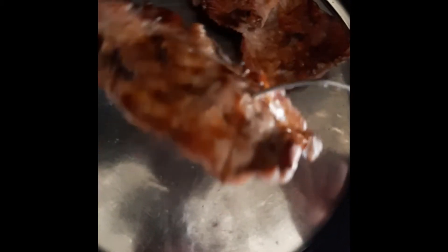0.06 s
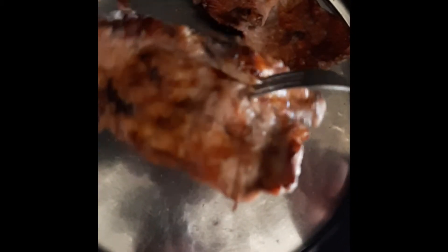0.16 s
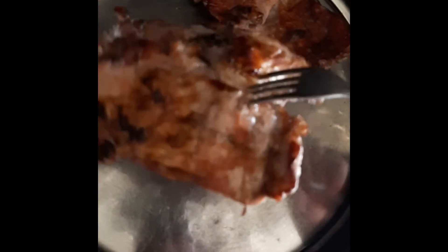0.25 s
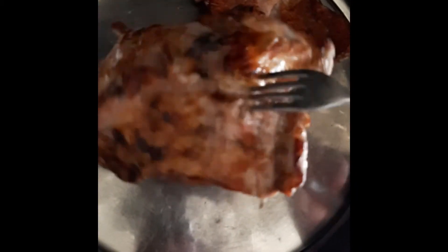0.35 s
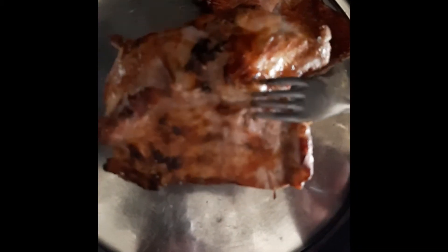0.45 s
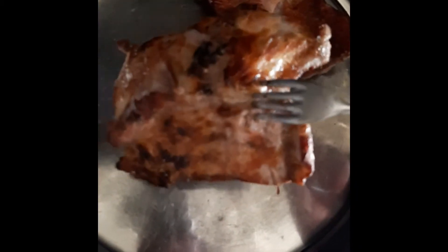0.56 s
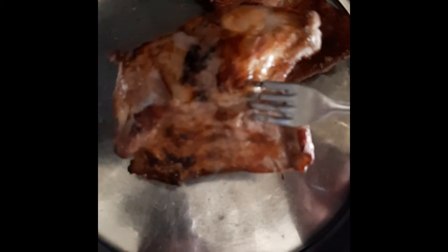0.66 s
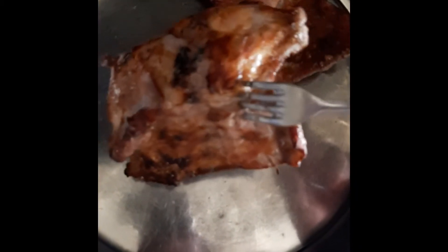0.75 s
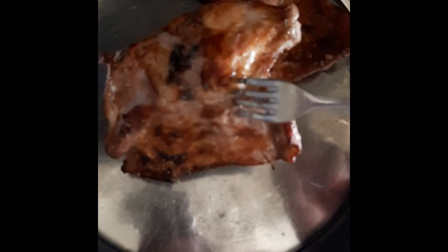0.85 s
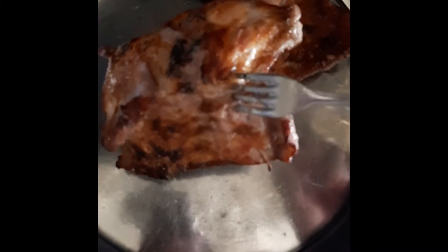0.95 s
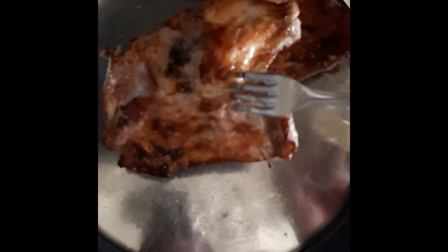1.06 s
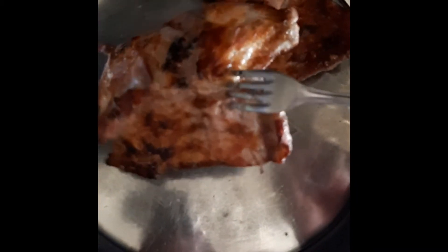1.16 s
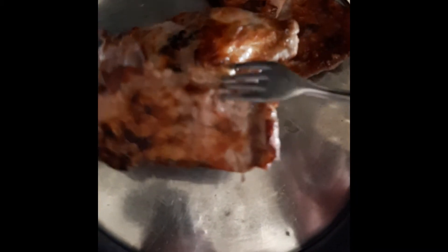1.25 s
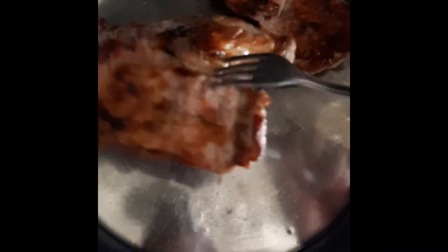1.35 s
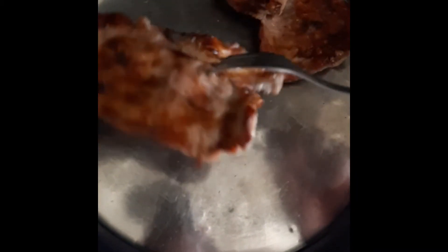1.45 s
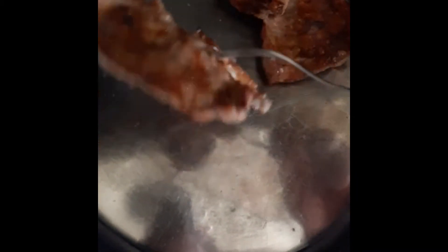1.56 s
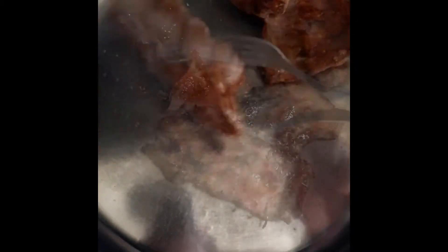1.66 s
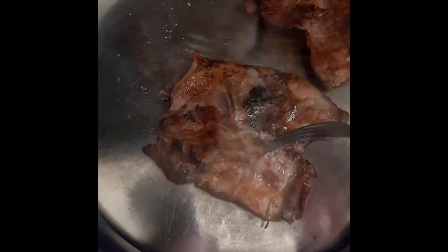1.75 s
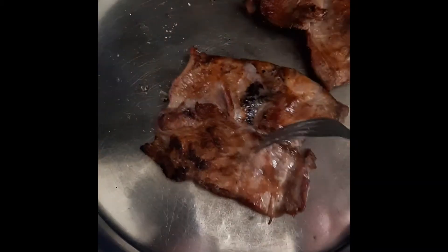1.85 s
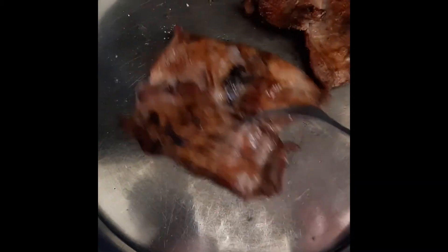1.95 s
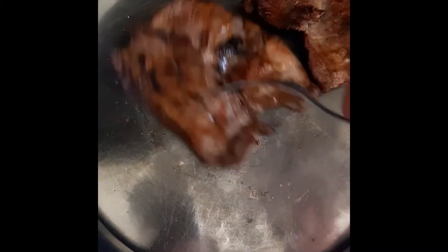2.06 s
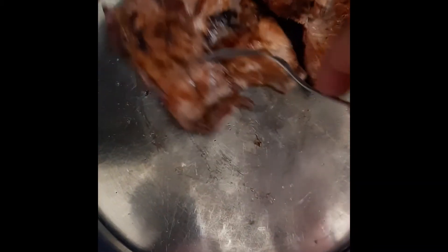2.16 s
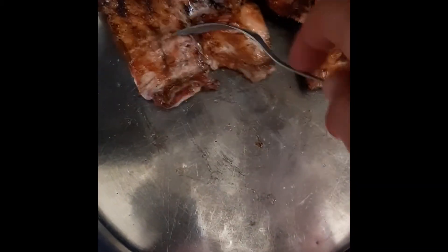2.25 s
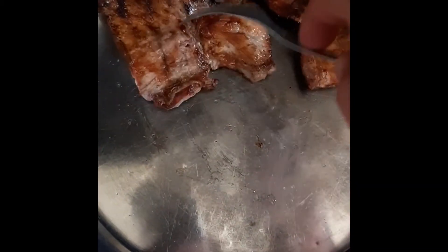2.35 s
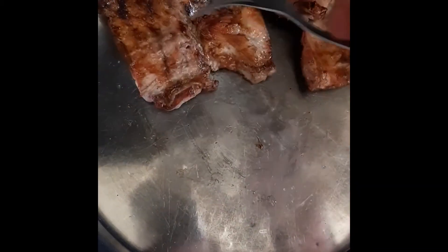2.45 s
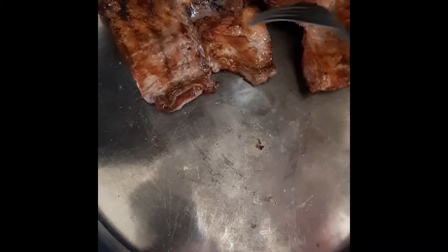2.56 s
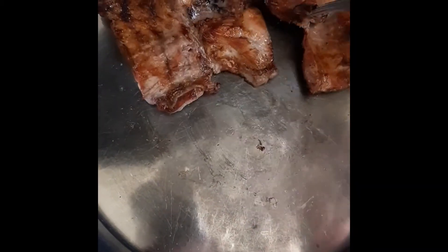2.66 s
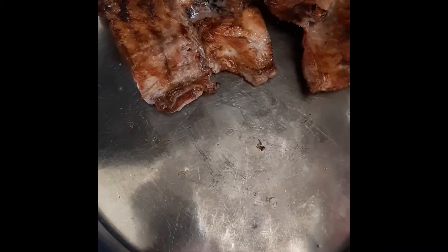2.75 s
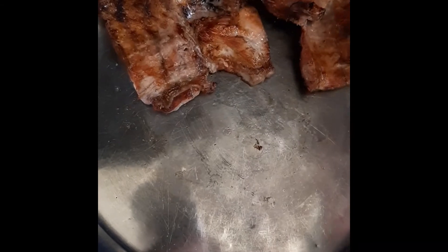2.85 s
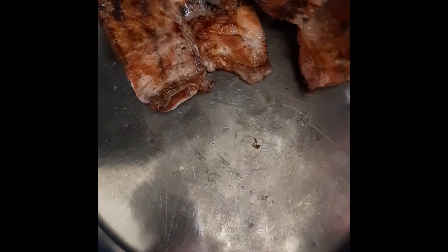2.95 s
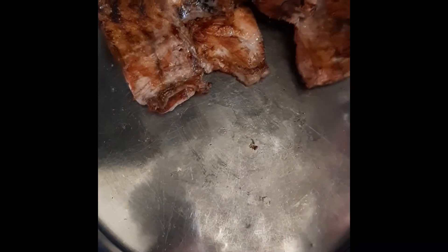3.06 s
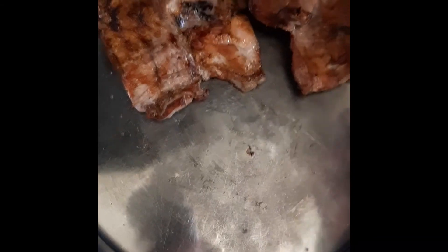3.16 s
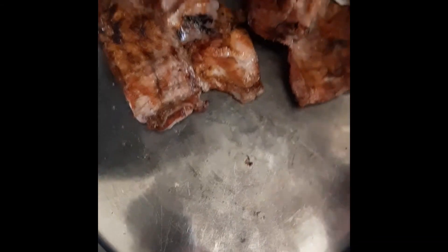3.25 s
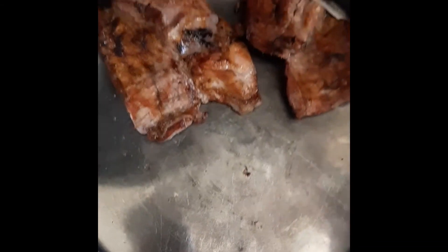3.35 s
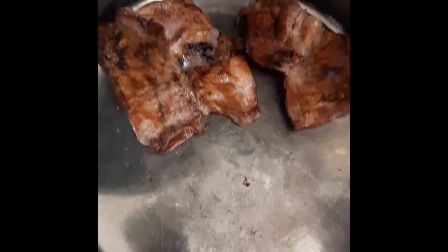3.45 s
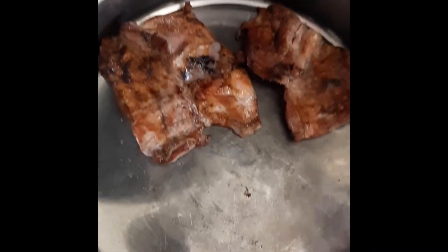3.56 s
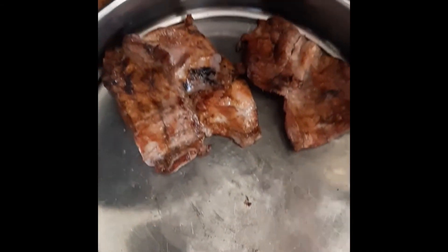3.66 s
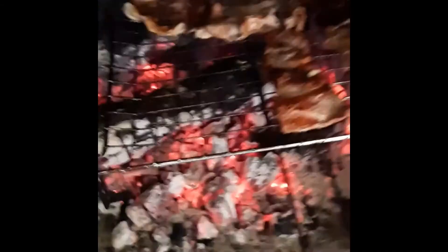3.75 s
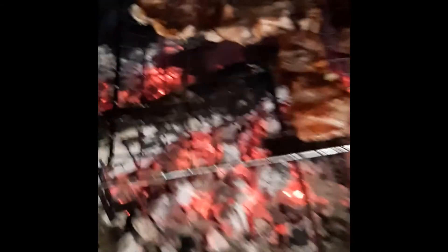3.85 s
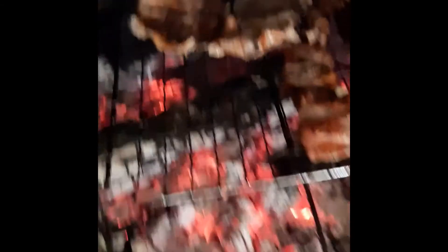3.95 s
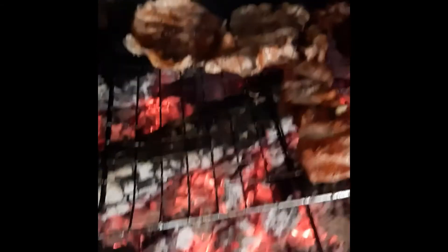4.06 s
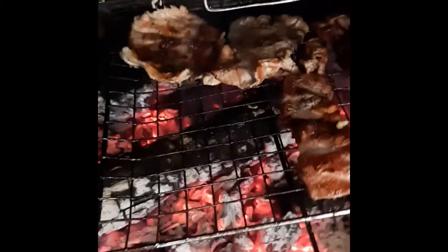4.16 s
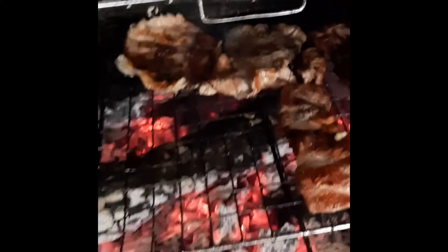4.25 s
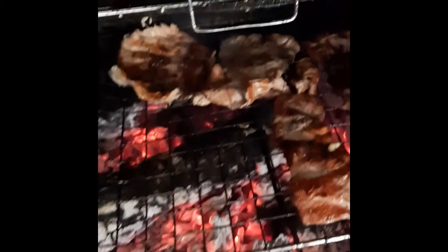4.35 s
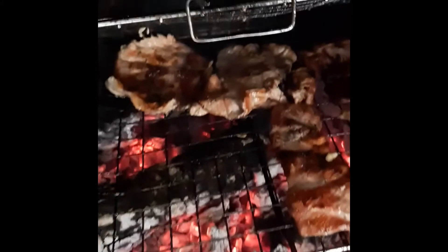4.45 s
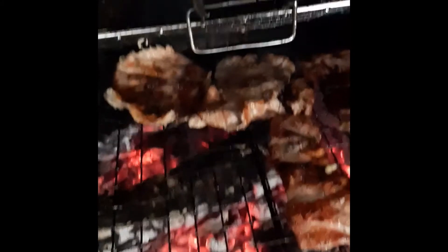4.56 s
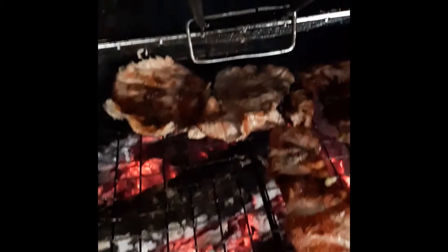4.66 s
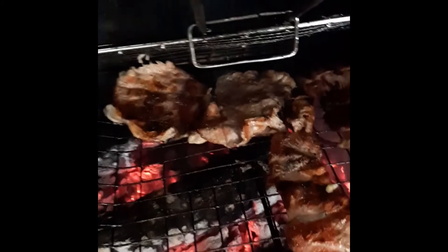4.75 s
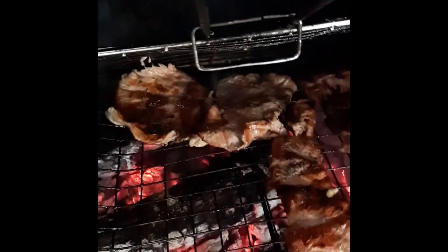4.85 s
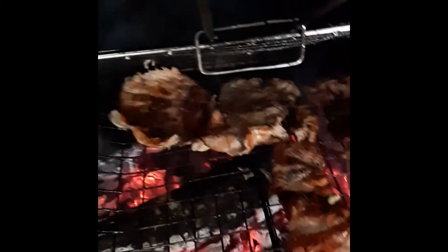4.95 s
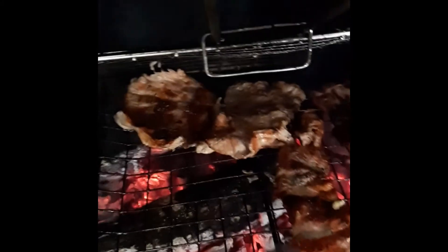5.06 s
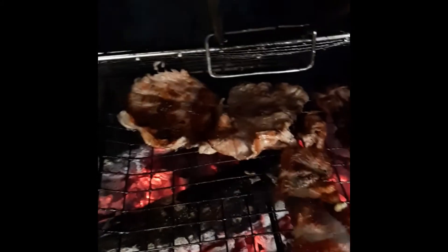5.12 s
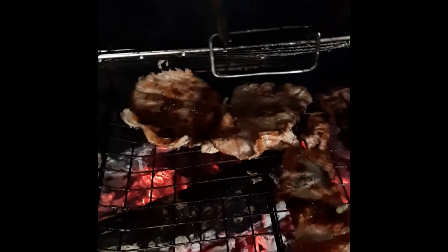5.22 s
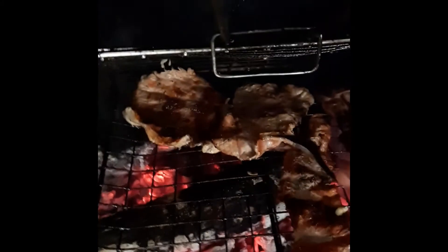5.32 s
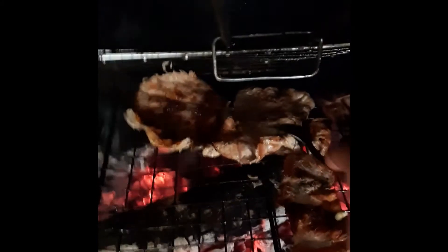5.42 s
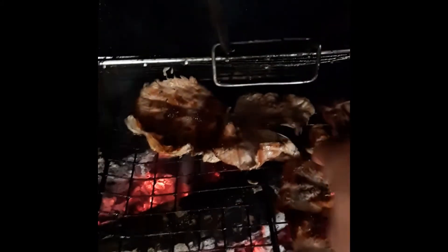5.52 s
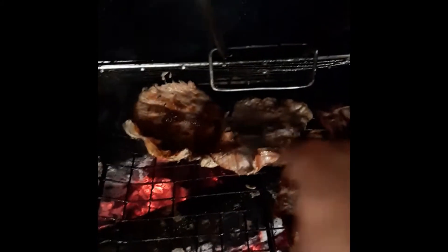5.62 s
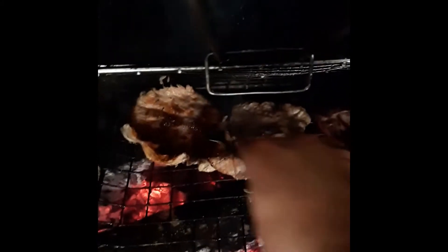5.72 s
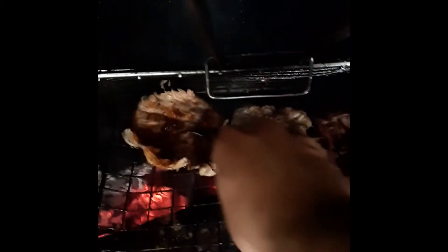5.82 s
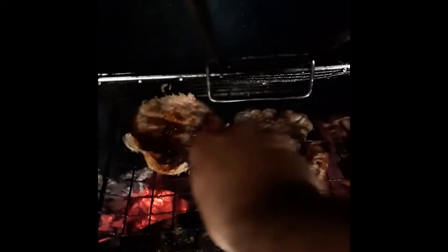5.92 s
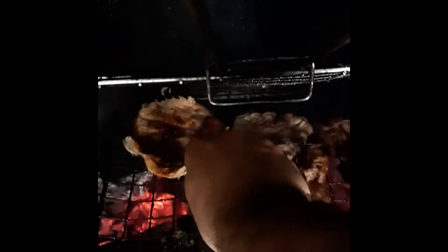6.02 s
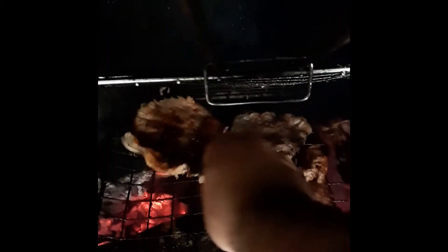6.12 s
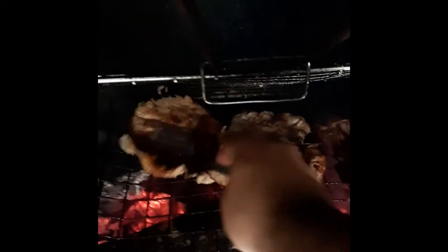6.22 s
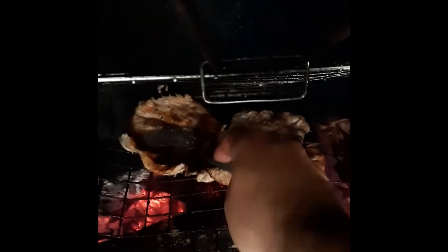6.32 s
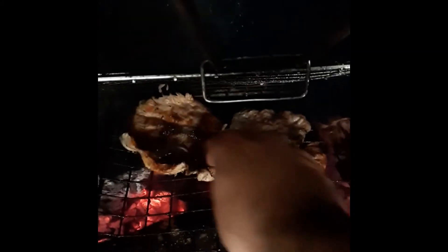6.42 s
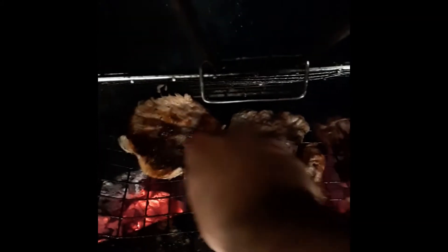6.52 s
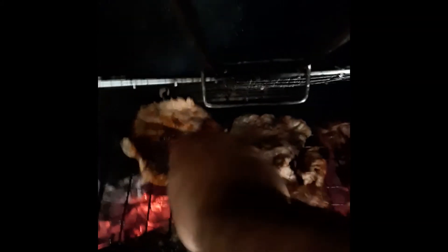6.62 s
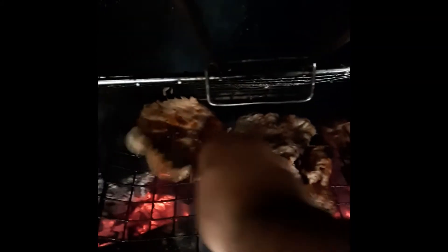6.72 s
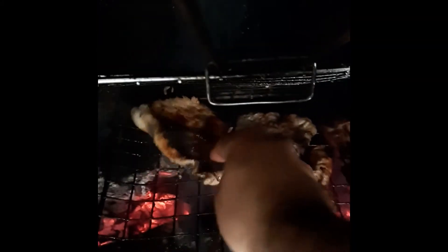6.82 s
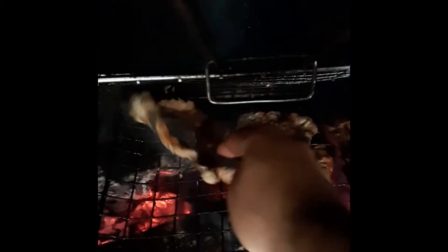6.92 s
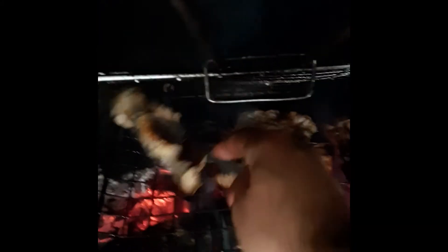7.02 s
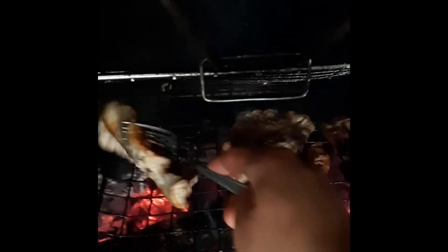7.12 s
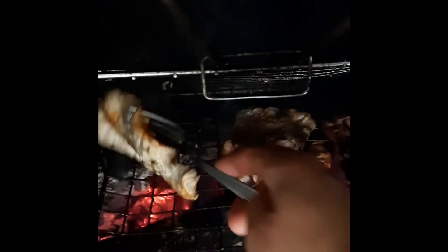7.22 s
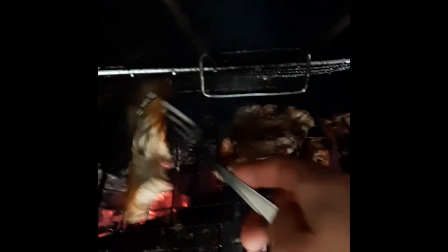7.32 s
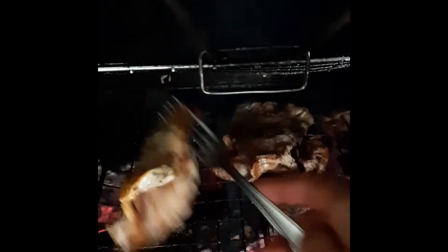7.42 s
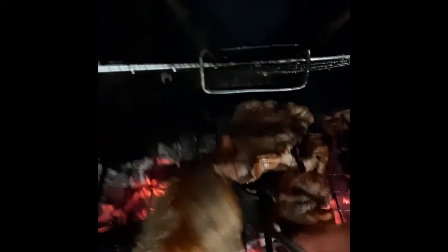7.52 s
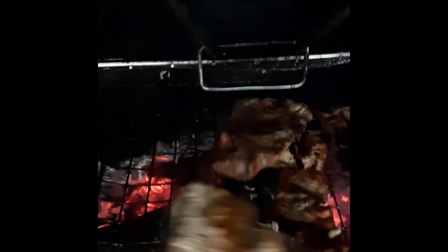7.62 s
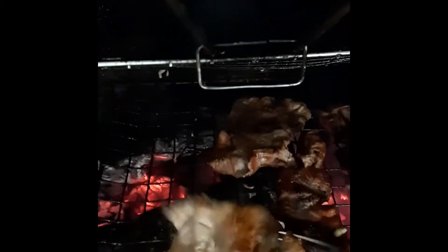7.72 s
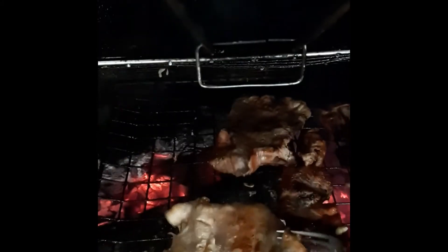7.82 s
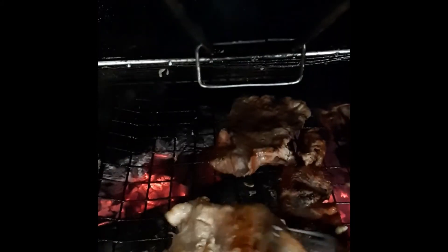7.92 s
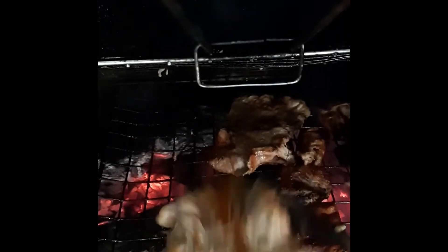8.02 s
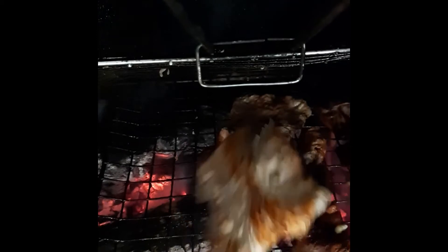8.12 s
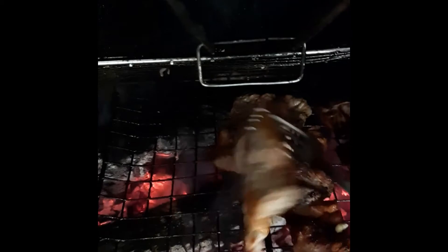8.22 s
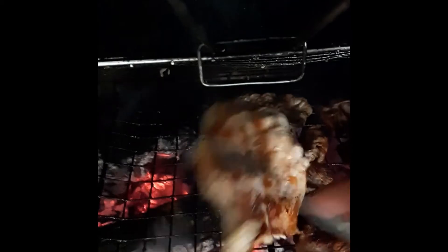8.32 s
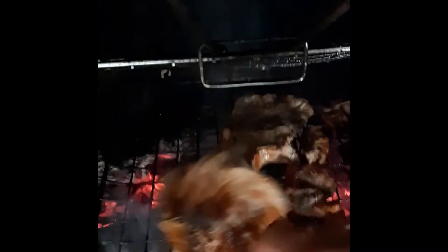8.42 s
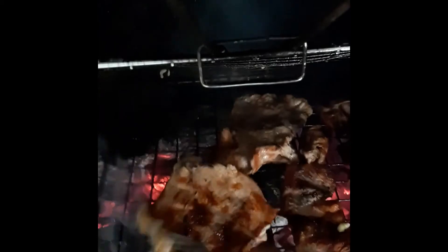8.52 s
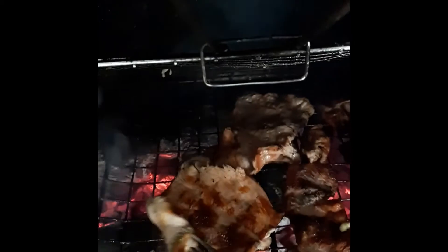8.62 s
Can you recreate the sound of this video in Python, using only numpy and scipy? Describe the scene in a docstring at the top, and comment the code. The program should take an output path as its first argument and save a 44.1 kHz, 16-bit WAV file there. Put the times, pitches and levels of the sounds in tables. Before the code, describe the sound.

Close to an outdoor charcoal grill, fat hisses, crackles and pops throughout above a faint low background hum. Meat lands on a steel tray with a few slaps and clinks, followed by two soft scrapes. The wire grate then rattles as a fork pulls meat over it. The dragging gets heavier and the frying louder, ending in several hard metallic knocks.

```python
"""Meat fries over charcoal above a low outdoor drone, heard at a camera's two microphone ports.
From the start, bursting bubbles of fat hiss, crackle and spit. Near 2 s meat slaps and slides on a
steel tray; two soft rubbing scrapes follow near 3 s. Steam whistles briefly through a pore, and from
4 s a fork drags the meat over the wire grate, which rumbles and rattles. From 6 s the frying swells
and the dragging grows heavier; from 7.6 s comes a run of hard knocks."""
import sys
import numpy as np
from scipy import signal
from scipy.fft import rfft, irfft, next_fast_len
from scipy.io import wavfile
from scipy.ndimage import uniform_filter1d, map_coordinates

SR = 44100
rng = np.random.default_rng(int(sys.argv[2]) if len(sys.argv) > 2 else 0)


def generate_wav(sig):
    """Save sig (samples, or channels by samples) to the path in sys.argv[1] as 16-bit PCM at SR."""
    pcm = np.round(np.clip(np.atleast_2d(sig).T, -1, 1) * 32767).astype(np.int16)
    wavfile.write(sys.argv[1], SR, pcm)


N = 382788

# Normal modes of the bare metal: (frequency [Hz], level [dB], t60 [s])
METAL_MODES = [(82.7, -1, 0.39), (172, 0, 0.19), (238, -2.5, 0.18), (329, -1, 0.11), (438, -11, 0.1),
               (556, 0.5, 0.11), (684, -0.5, 0.071), (959, 4, 0.079), (1240, -6, 0.11), (1595, -2, 0.037),
               (2056, -5, 0.039), (2330, -0.5, 0.023), (2920, 8, 0.033), (4670, -2, 0.054)]
# Spectrum of coarse frying: (frequency [Hz], relative density [dB])
COARSE_SPECTRUM = [(410, -23.5), (700, -13.5), (971, -7.5), (1140, -5), (1480, -1.5), (2080, -3),
                   (2610, -4), (4500, -7.5), (5850, -11), (9900, -120)]


def amp(db):
    """Decibels as an amplitude ratio."""
    return np.exp(np.asarray(db) * np.log(10) / 20)


def unit(x):
    """Normalisation to rms 1."""
    return x / np.sqrt(np.mean(x ** 2) + 1e-20)


def along(points, hz):
    """Interpolation on a logarithmic frequency axis."""
    freqs, values = np.transpose(points)
    return np.interp(np.log(hz + 1), np.log(freqs + 1), values)


def curves(rows):
    """Linear interpolation, per sample, of each column after the time."""
    times, *columns = np.transpose(rows)
    return np.array([np.interp(np.arange(N) / SR, times, column) for column in columns])


def wobble(rate):
    """Smooth random modulation, with rate knots a second."""
    knots = rng.standard_normal(int(N * rate / SR) + 4)
    return map_coordinates(knots, [np.arange(N) * rate / SR])


def swells(rows, linger):
    """Exponential rise and decay of events whose powers add; linger scales each column's fade time."""
    t = np.arange(0, N / SR + .002, .002)
    peak, rise, fade, *levels = np.transpose(rows)[..., None]
    shapes = [amp(db - 10 * np.maximum((peak - t) / rise, (t - peak) / (stretch * fade)))
              for db, stretch in zip(levels, linger)]
    return np.array([np.interp(np.arange(N) / SR, t, np.linalg.norm(s, axis=0)) for s in shapes])


def filtered(x, response):
    """Linear filtering: the spectrum times a frequency response."""
    size = next_fast_len(N + SR // 4)
    return irfft(rfft(x, size) * response(np.fft.rfftfreq(size, 1 / SR)), size)[..., :N]


def coloured(x, spectrum):
    """Spectral shaping by a table, at rms 1."""
    return unit(filtered(x, lambda hz: amp(along(spectrum, hz))))


def stereo_noise(response):
    """Partial coherence: low noise is much alike at both ports, high noise is not."""
    # Likeness of the ports: (frequency [Hz], correlation [ratio])
    coherence = [(25, .6), (60, 1), (130, 0.72), (300, 0.61), (700, 0.67), (1500, 0.048)]
    angle = lambda hz: np.arccos(np.clip(along(coherence, hz), -1, 1)) / 2
    noise = rng.standard_normal((2, N))
    mid, side = filtered(noise, lambda hz: response(hz) * [np.cos(angle(hz)), np.sin(angle(hz))])
    return unit(np.array([mid + side, mid - side]))


def at_ports(direct, scattered, share):
    """Path difference: the direct share of the power reaches the right port late; the rest is diffuse."""
    # Lag of the right port: (time [s], delay [samples])
    lag = [(0, 17), (3.8, 22.5), (5.6, 18.3), (6.2, 4), (8.68, 3.1)]
    late = np.clip(np.arange(N) - np.round(curves(lag)[0]).astype(int), 0, N - 1)
    return np.sqrt(share) * np.array([direct, direct[late]]) + np.sqrt(1 - share) * scattered


def drone():
    """Ambient noise: the low, nearly steady background of the open air."""
    # Outdoor spectrum: (frequency [Hz], relative density [dB])
    spectrum = [(12, -49), (20, -16), (70, 6.5), (211, -10.5), (295, -13.5), (658, -14.5), (770, -37),
                (1300, -7), (1690, -50), (2860, -120)]
    return amp(-70 + 0.21 * wobble(1.86)) * stereo_noise(lambda hz: amp(along(spectrum, hz)))


def shaken(band):
    """Resonance: noise drives the metal's modes in one part's band; the meat's damping widens them."""
    modes = lambda hz: np.sqrt(sum(amp(db) ** 2 / (1 + ((hz - centre) * t60 / 3) ** 2)
                                   for centre, db, t60 in METAL_MODES))
    return stereo_noise(lambda hz: amp(along(band, hz)) * modes(hz))


def dragging():
    """Friction: meat and fork slide on the tray, later the grate, shaking frame, wires and stand."""
    # Shoves: (peak time [s], 10 dB rise [s], nominal 10 dB fade [s], frame [dB], wires [dB], stand [dB])
    shoves = [ (1.836, 0.013, 0.069, -59, -42, -80), (1.925, 0.042, 0.025, -62, -52.5, -82),
              (2.32, 0.0081, 0.031, -64, -50, -90), (3.814, 0.0099, 0.089, -76, -80, -56),
              (4.044, 0.027, 0.23, -72, -92, -62), (4.3, 0.017, 0.091, -47, -61.5, -60),
              (4.534, 0.016, 0.12, -64, -67, -71), (4.61, 0.071, 0.1, -51.5, -78, -58),
              (5.016, 0.37, 0.081, -61, -69, -58.5), (6.026, 0.081, 0.7, -61, -62, -65),
              (6.29, 0.02, 0.18, -59, -70, -57.5), (6.666, 0.02, 0.071, -49.5, -48.5, -59),
              (6.825, 0.018, 0.092, -39, -47, -49), (6.93, 0.093, 0.072, -46.5, -50.5, -44.5),
              (7.2, 0.088, 0.064, -47.5, -56, -62), (7.28, 0.29, 0.11, -49.5, -73, -59),
              (7.665, 0.019, 0.3, -42, -50, -50.5), (7.843, 0.068, 0.44, -64, -55, -67),
              (8.575, 0.025, 0.28, -45, -63, -54.5), (8.635, 0.046, 0.042, -49, -40.5, -37)]
    # Factors on the fade time: (frame [ratio], wires [ratio], stand [ratio])
    linger = [0.92, 0.97, 1.52]
    # Bands in which the three parts vibrate: (frequency [Hz], gain [dB])
    frame_band = [(60, -29), (130, 9), (400, -3), (600, -14), (1100, -62)]
    wire_band = [(240, -22), (450, -3), (1400, -9), (2000, -15), (3300, -64)]
    stand_band = [(20, -38), (50, 0), (120, 0), (200, -26), (330, -60)]
    frame_gain, wire_gain, stand_gain = swells(shoves, linger)
    frame = frame_gain * amp(1.2 * wobble(30)) * shaken(frame_band)
    wires = wire_gain * amp(3.9 * wobble(30)) * shaken(wire_band)
    return (frame + wires) * amp([[1.5], [-1.5]]) + stand_gain * shaken(stand_band)


def knocks():
    """Impact excitation: a blow rings the modes near its spot's pitch; a hard, wide one also clacks."""
    # Slaps on the tray, then blows on the grate:
    # (time [s], level [dB], centre pitch [Hz], spread [octaves])
    blows = [ (1.788, -26, 1320, 0.17), (1.836, -27.5, 400, 0.45), (1.881, -26, 1440, 0.25),
             (2.005, -24, 1750, 0.23), (2.041, -28, 1710, 0.24), (2.262, -41, 865, 0.45),
             (3.799, -45, 120, 0.88), (3.948, -46, 233, 0.22), (4.035, -50, 79.5, .3),
             (4.285, -30, 900, 4.15), (4.288, -37, 189, 0.28), (4.553, -33.5, 1600, 0.4),
             (4.599, -37.5, 170, 0.26), (4.909, -39.5, 1630, 0.22), (6.256, -34, 4670, 0.27),
             (6.666, -36, 340, 0.12), (6.807, -31, 243, 1.1), (6.899, -38.5, 970, 0.15),
             (7.178, -33.5, 340, 0.14), (7.385, -40.5, 330, 0.17), (7.645, -30.5, 900, 3.4),
             (7.686, -21.5, 500, 1.5), (7.688, -26, 2080, 0.22), (7.76, -22, 2300, .35),
             (7.886, -21, 2100, 0.18), (8.048, -22, 2160, 0.22), (8.249, -19.5, 2220, 0.22),
             (8.613, -30, 960, 0.17), (8.615, -26, 122, 1.6)]
    damped = 0.9  # meat lying on the metal shortens the ring to this share
    out, t = np.zeros((2, N + SR)), np.arange(SR // 5) / SR
    chatter = np.pad(amp(2.6 * wobble(250)), (0, SR))  # loose parts rattle and roughen the ring
    hz, mode_db, t60 = np.transpose(METAL_MODES)[..., None]
    decay = amp(-60 * t / (damped * t60))
    attack = 1 - np.exp(-t / 0.00064)
    push_pull = np.exp(-(t / 0.00015 - 2) ** 2) * np.sin(2 * np.pi * 1500 * (0.00035 - t))
    for time, db, spot_hz, spread in blows:
        nearness = np.exp(-(np.log2(hz / spot_hz) / spread) ** 2 / 2)
        weights = amp(mode_db + rng.normal(0, 1.8, hz.shape)) * nearness
        phase = rng.normal(0, 1.0, (2, *hz.shape))  # each port meets each mode at its own phase
        modes = weights * decay * np.sin(2 * np.pi * hz * t + phase)
        ring = attack * modes.sum(axis=1) / weights.sum()
        clack = 0.26 * spread ** 2 * push_pull
        span = round(time * SR) + np.arange(len(t))
        out[:, span] += amp(db) * (chatter[span] * ring + clack)
    return out[:, :N] * amp([[1.2], [-1.2]])


def whistle():
    """Jet tones: steam is forced through a pore; wandering phase broadens each spectral line."""
    # Jets of steam: (start [s], length [s], level [dB], lift above 14 kHz [dB])
    jets = [(3.895, 0.033, -34, -2), (3.928, 0.009, -37, 14), (3.931, 0.022, -37.5, -4)]
    # Tones of the pore: (frequency [Hz], linewidth [Hz], level [dB])
    pore_tones = [(10880, 49, -3.5), (13800, 70, -6), (14900, 260, -7), (14800, 290, -5)]
    t, tones = np.arange(N) / SR, np.zeros(N)
    gates = [np.clip((t - start) / .0015, 0, 1) * np.clip((start + length - t) / 0.014, 0, 1)
             for start, length, _, _ in jets]
    for hz, width, tone_db in pore_tones:
        envelope = sum(amp(db + lift * (hz > 14000)) * gate for gate, (_, _, db, lift) in zip(gates, jets))
        drift = np.cumsum(rng.normal(0, np.sqrt(2 * np.pi * width / SR), N))
        tones += envelope * amp(tone_db) * np.sin(2 * np.pi * hz * t + drift)
    return amp(1.6 * wobble(150)) * tones


def pops():
    """Pressure release: a large bubble bursts in one bright click."""
    # Large bubbles: (time [s], level before filtering [dB])
    bursts = [(.2795, -13), (1.2896, -14), (1.6063, -9), (2.4311, -8), (2.4393, -16), (2.583, -15),
              (4.5172, -10), (6.0995, -14), (6.2152, -14), (6.757, -11)]
    times, db = np.transpose(bursts)
    impulses = np.bincount(np.round(times * SR).astype(int), amp(db), N)
    return filtered(at_ports(impulses, 0, share=0.65), lambda hz: 1j * np.clip(hz / 11000, 0, 1) ** 2)


def noise_bursts():
    """Exponential decay: spits, a scrape and a clack are puffs of bright noise with a duller body."""
    # Spits of fat, a soft rubbing scrape at 3.3 s and one dry clack at 6 s:
    # (time [s], bright level [dB], t60 [s], body relative to bright [dB])
    bursts = [ (0.607, -32.5, 0.066, -12.5), (0.943, -26.5, 0.046, -17), (1.031, -31, 0.056, -20),
              (1.289, -26, 0.021, -42), (1.3552, -32, 0.052, -14.5), (1.677, -26, 0.023, -34),
              (1.7866, -23.5, 0.059, -6), (1.796, -25, 0.1, -6.5), (1.832, -19, 0.042, -11),
              (1.8377, -21, 0.047, -6), (1.922, -27, 0.036, -4), (1.93, -29.5, .05, -2),
              (2.022, -24, 0.035, -16), (2.261, -31.5, 0.082, -5), (2.3161, -26.5, 0.037, -17),
              (2.599, -21.5, 0.028, -34), (2.606, -25, 0.032, -35), (3.345, -37, 0.43, -14),
              (3.8945, -28.5, 0.044, -32), (3.925, -24, 0.027, -35), (4.016, -28, .02, -37),
              (4.119, -23, 0.018, -39), (4.518, -24.5, 0.024, -19), (4.847, -29, 0.034, -16),
              (5.3734, -23, 0.027, -22), (5.596, -26.5, .015, -36), (5.9804, -24.5, 0.058, -31),
              (6.006, -38.5, .018, 7), (6.598, -33, 0.2, -11), (6.756, -21.5, 0.023, -24),
              (6.917, -30, 0.025, -15), (7.1216, -24.5, 0.014, -16), (7.76, -24.5, 0.026, -4),
              (7.828, -22.5, 0.024, -12), (7.864, -24, 0.014, -5), (7.886, -25, .025, -7),
              (8.048, -28, 0.034, -3.5), (8.092, -32, .02, -11.5), (8.249, -29.5, 0.051, -0.5)]
    bright, body = np.zeros((2, N + SR))
    t = np.arange(SR // 4) / SR
    for time, db, t60, body_db in bursts:
        puff = amp(db - 60 * t / t60) * (1 - np.exp(-t / (t60 / 40)))  # long puffs start softly
        bright[round(time * SR):][:len(t)] += puff
        body[round(time * SR):][:len(t)] += amp(body_db) * puff
    noise = rng.standard_normal((3, N))
    treble = filtered(noise, lambda hz: 1 / (1 + (4200 / (hz + 1)) ** 4.5))
    puffs = bright[:N] * unit(treble) + body[:N] * coloured(noise, COARSE_SPECTRUM)
    return at_ports(puffs[0], puffs[1:], share=0.21)


def bubbles(rate, spread_db):
    """Shot noise: bursting bubbles are impulses at random times, of random, bounded size."""
    when, chance = rng.random((int(rate * N / SR), 2)).T
    sizes = amp(spread_db * np.minimum(-np.log(1 - chance), 3))
    return unit(np.bincount((when * N).astype(int), sizes, N))


def patchy(x, depth_db):
    """Amplitude modulation: each narrow band flutters as spots of fat boil up and dry out."""
    bands = signal.stft(x, nperseg=512)[2]
    flutter = uniform_filter1d(rng.standard_normal(bands.shape[1:]), size=3, axis=0)  # over frequency
    flutter = uniform_filter1d(flutter, size=6, axis=1)  # over time
    return signal.istft(bands * amp(depth_db * unit(flutter)), nperseg=512)[1][:, :N]


def frying(spectrum, crackle, crackle_db, sputter):
    """Superposition: unevenly modulated hiss plus the sharp crackle of single bubbles."""
    noise = rng.standard_normal((3, N))
    hiss = sputter * patchy(at_ports(noise[0], noise[1:], share=0.065), depth_db=2.0)
    return coloured(unit(hiss) + amp(crackle_db) * at_ports(crackle, 0, share=0.82), spectrum)


def over_bars(coarse, spatter):
    """Coupling: drops ring the cross bars under the meat, and the frying thins below their pitch."""
    # Coupling of frying to bars: (time [s], gain [dB])
    coupling_db = [(3.9, -4), (4.1, -3.5), (7.55, -6), (7.65, -3)]
    # Band in which the bars vibrate: (frequency [Hz], gain [dB])
    bar_band = [(1500, -36), (2000, -0.5), (2500, -8.5), (3200, -26)]
    lows = filtered(coarse, lambda hz: 1 / (1 + (hz / 1700) ** 6))
    ring = amp(-3.0 + 2.8 * wobble(70)) * unit(spatter) * shaken(bar_band)
    return coarse + amp(curves(coupling_db)) * (ring - lows)


def sizzle():
    """Frying of three grain sizes in an acoustic shadow: the camera shades the finest sound most."""
    # Steady frying: (time [s], fine [dB], coarse [dB], spray [dB])
    steady = [(0, -45, -55.5, -39), (1.18, -44.5, -58, -41), (1.76, -41.5, -55.5, -36),
              (1.98, -39.5, -40.5, -37), (2.1, -38, -46.5, -37), (2.37, -45, -47, -36.5),
              (2.43, -49, -77, -42), (2.6, -46.5, -61.5, -41.5), (3.8, -47, -59.5, -41),
              (4.1, -43.5, -53, -39), (4.47, -45, -54.5, -40), (4.62, -44, -49.5, -40),
              (4.85, -45.5, -54.5, -40.5), (5.44, -44, -53, -40), (5.92, -47, -53.5, -40),
              (7.57, -44, -49, -38.5), (8.68, -48, -69, -35)]
    # Flares where meat lands, is pressed or turned, and a soft rubbing scrape at 3.04 s:
    # (peak time [s], 10 dB rise [s], 10 dB fade [s], fine [dB], coarse [dB], spray [dB])
    surges = [ (.11, 0.058, 0.015, -43, -54, -37), (.27, 0.038, .1, -43.5, -58, -34),
              (.355, 0.038, 0.052, -40.5, -50, -39), (1.79, 0.011, 0.08, -35, -33, -36),
              (1.84, 0.022, 0.048, -32.5, -32, -32), (1.93, .05, 0.039, -33.5, -43, -36.5),
              (2.32, 0.031, 0.086, -37.5, -40.5, -42), (3.04, 0.091, 0.074, -53, -50, -47),
              (4.52, 0.025, 0.14, -42, -58, -43), (4.71, 0.12, 0.13, -42, -55, -38.5),
              (6.0, 0.02, 0.16, -39.5, -47.5, -35.5), (6.11, 0.025, 0.32, -35.5, -45, -27.5),
              (6.615, 0.014, 0.13, -36, -46, -27.5), (6.665, 0.056, 0.013, -36, -52, -28),
              (6.89, 0.17, 0.05, -40.5, -43.5, -37.5), (7.13, 0.089, 0.037, -41, -43.5, -43),
              (7.69, 0.085, 1, -35.5, -38.5, -28.5), (8.17, 0.14, 0.23, -32.5, -36.5, -26),
              (8.61, 0.065, 0.17, -32, -35.5, -28)]
    # Spectra of fine hiss and finest spray: (frequency [Hz], relative density [dB])
    fine_spectrum = [(1500, -27.5), (2500, -10.5), (3860, -5.5), (4530, -4), (6540, -2.5), (7280, 1),
                     (9000, -3), (11500, -4), (14000, -60)]
    spray_spectrum = [(6000, -38), (8500, -8), (11000, -5), (15500, -2)]
    # Bearing of the fire: (time [s], left minus right level of the fine hiss [dB])
    bearing = [(0, 2.5), (3.9, 2), (4.1, 0.5), (5.6, 0), (8.68, .5)]
    fine_gain, coarse_gain, spray_gain = np.hypot(amp(curves(steady)), swells(surges, np.ones(3)))
    small = bubbles(rate=300, spread_db=3.5)
    flash = np.exp(-np.arange(SR // 20) / SR / 0.0051)  # a drop of fat flashes off at once
    spatter = 2.0 + 0.32 * unit(signal.fftconvolve(bubbles(rate=35, spread_db=2.0), flash)[:N])
    fine = frying(fine_spectrum, small, crackle_db=-16.5, sputter=spatter * amp(1.13 * wobble(23)))
    spray = frying(spray_spectrum, small, crackle_db=-10.5, sputter=spatter * amp(1.35 * wobble(20)))
    larger = bubbles(rate=130, spread_db=2.0)
    coarse = frying(COARSE_SPECTRUM, larger, crackle_db=-9.5, sputter=spatter * amp(2.45 * wobble(40)))
    shadow = lambda depth: amp(depth * curves(bearing) * [[.5], [-.5]])
    return (coarse_gain * over_bars(coarse, spatter) * shadow(0.14)
            + (spray_gain * spray + pops()) * shadow(2.06)
            + (fine_gain * fine + whistle() + noise_bursts()) * shadow(1.0))


def scene():
    """Superposition: the pressures of all sources add at each port."""
    return sizzle() + dragging() + knocks() + drone()


def record(dry):
    """Band limiting: the microphone loses the deepest bass, the camera the highest treble."""
    bass_hz, top_hz = 35, 15780
    return filtered(dry, lambda hz: (hz < top_hz) / (1 + (bass_hz / (hz + 1)) ** 2))


dry = scene()
out = record(dry)
generate_wav(out)
```